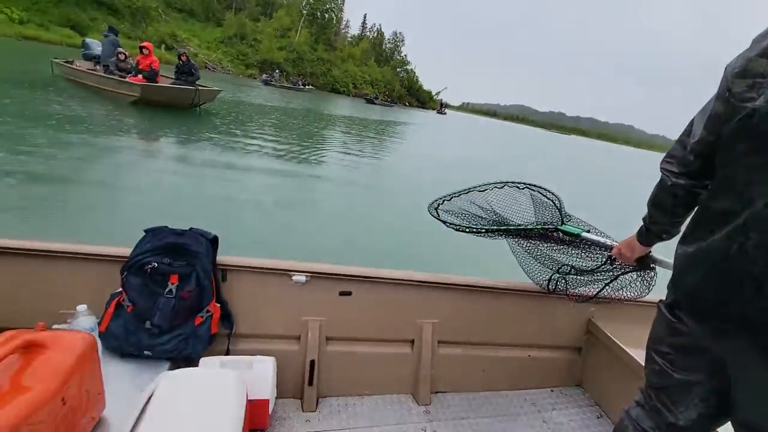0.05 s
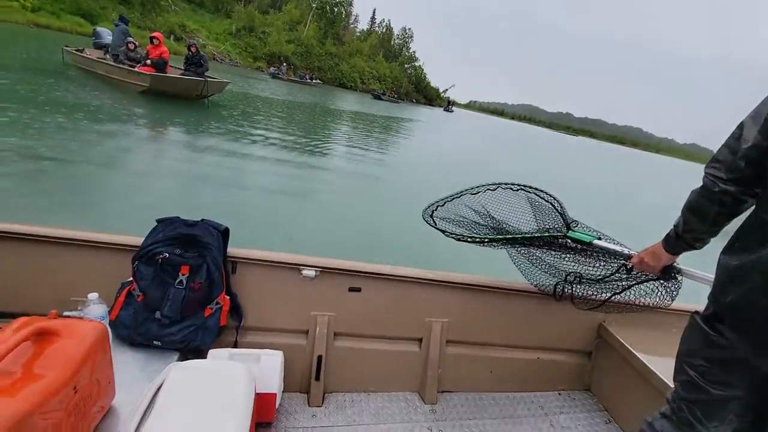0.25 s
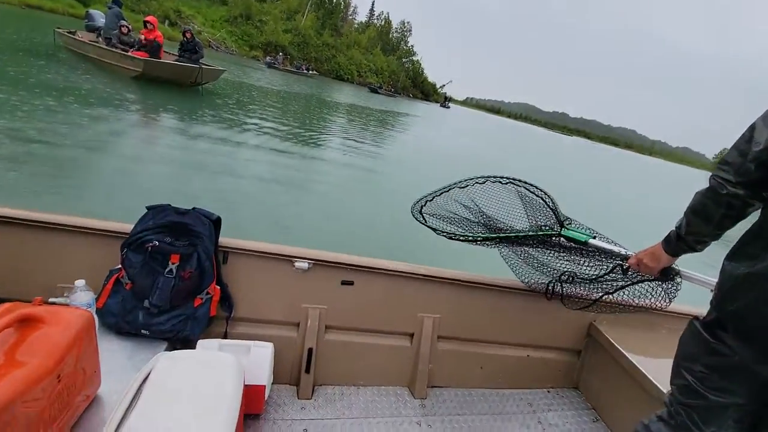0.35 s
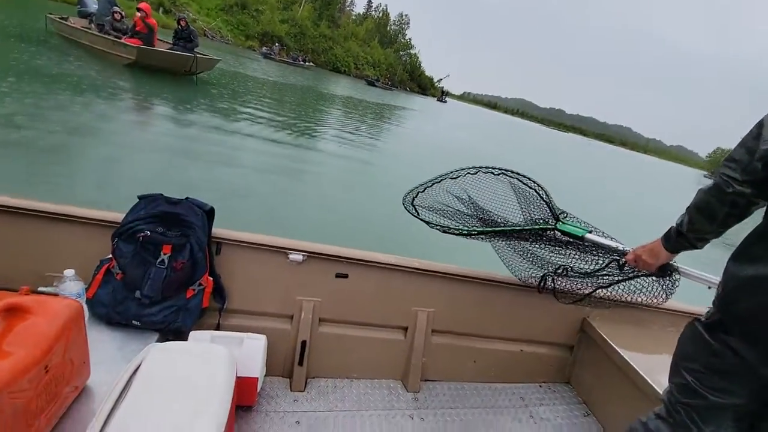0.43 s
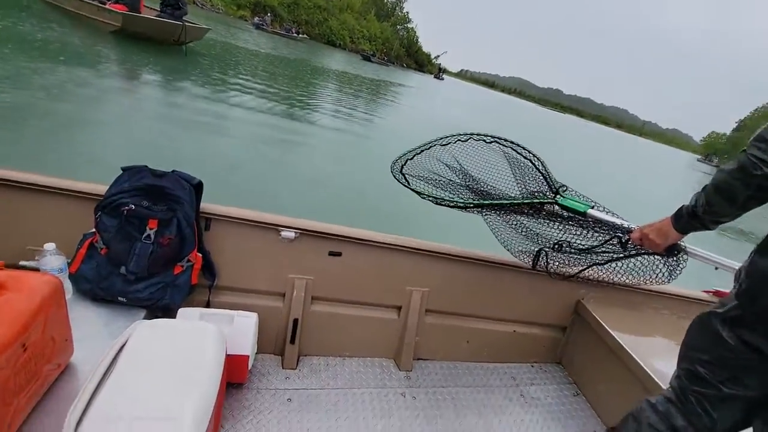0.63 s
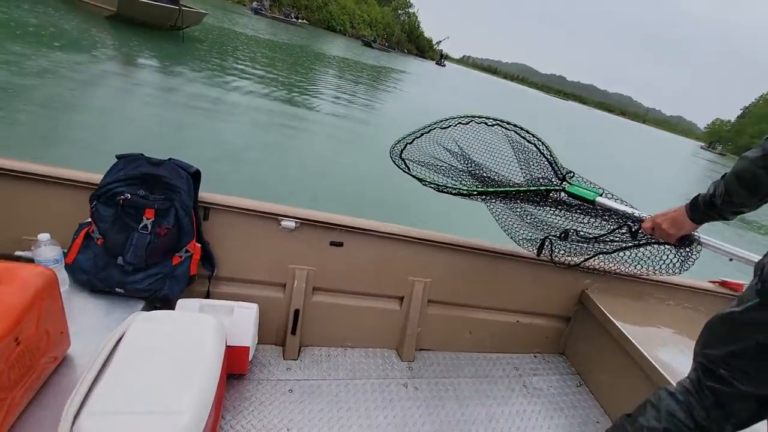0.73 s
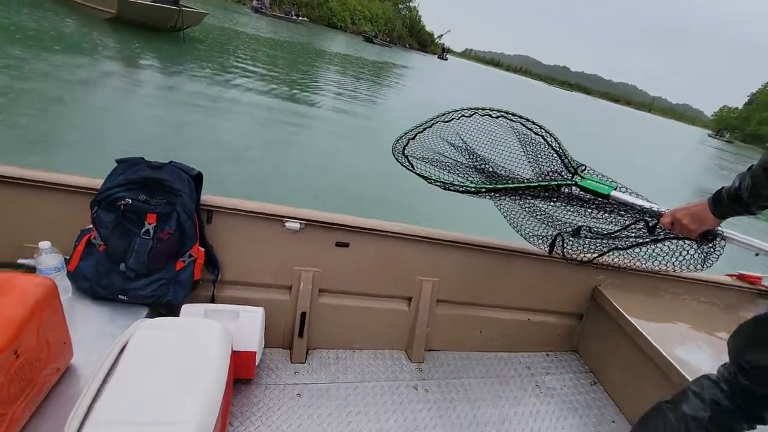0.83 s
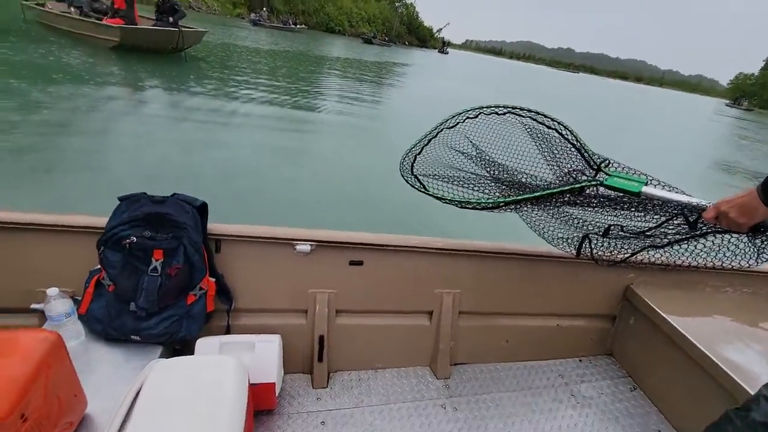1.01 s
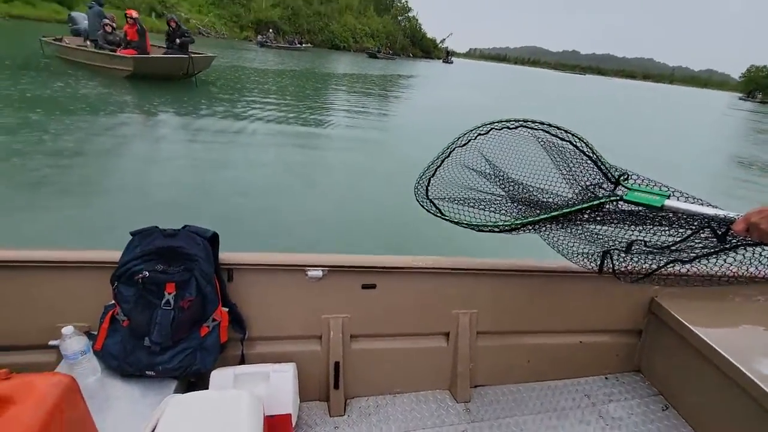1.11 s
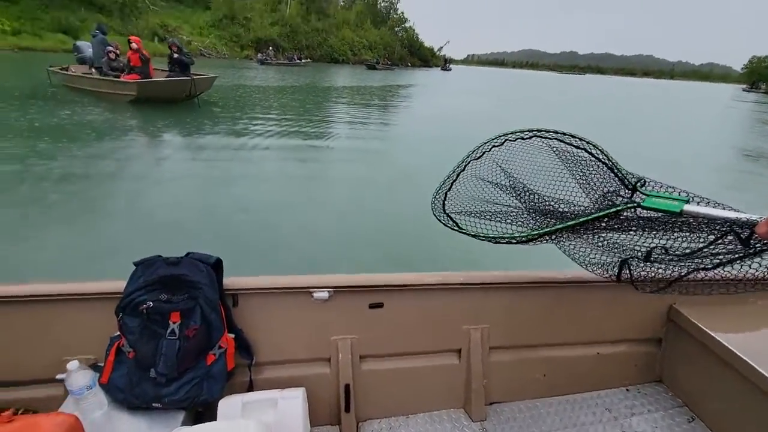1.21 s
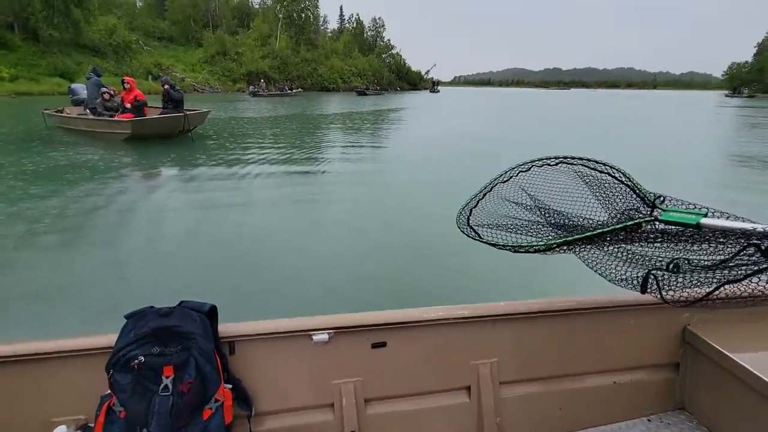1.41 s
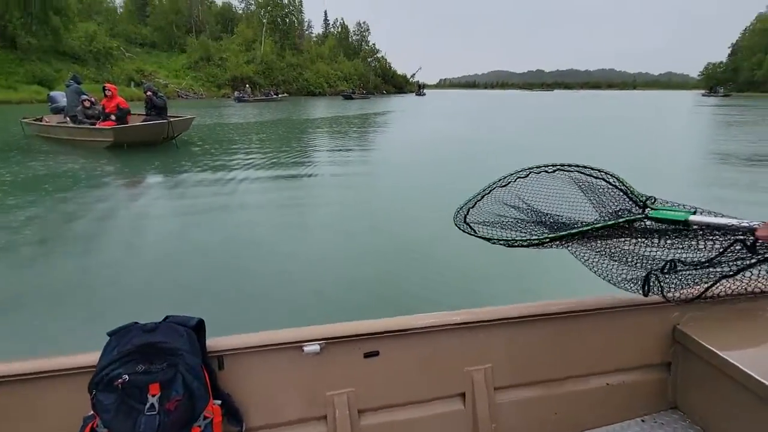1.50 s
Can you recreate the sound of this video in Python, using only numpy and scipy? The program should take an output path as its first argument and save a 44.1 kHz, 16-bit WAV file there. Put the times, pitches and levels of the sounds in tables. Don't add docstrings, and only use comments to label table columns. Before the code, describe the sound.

Close to a small stereo microphone, boots and gear thump a metal boat on a quiet river; a net handle rattles early, small ticks and wet cloth rustling follow, then one deep later thud.

```python
import sys
import numpy as np
from scipy import signal
from scipy.fft import rfft, irfft, next_fast_len
from scipy.io import wavfile
from scipy.ndimage import map_coordinates

SR = 44100
rng = np.random.default_rng(int(sys.argv[2]) if len(sys.argv) > 2 else 0)


def voltage_ratio(level):
    return 10 ** (np.asarray(level, float) / 20)


def pcm_store(signal):
    levels = np.round(np.clip(np.atleast_2d(signal), -1, 1) * 32767)
    wavfile.write(sys.argv[1], SR, levels.astype(np.int16).T)


N = 68355

SWAY_DB = 1.3
SCATTER_DB = 1.5


def unit(x):
    return x / np.sqrt(np.mean(x ** 2) + 1e-20)


def along(hz, f, v):
    return np.interp(np.log(hz + 1), np.log(np.asarray(f) + 1), v)


def curve_gain(f, curve):
    return voltage_ratio(along(f, *np.transpose(curve)))


def filtered(x, response):
    m = next_fast_len(len(x) + 8192)
    return irfft(rfft(x, m) * response(np.fft.rfftfreq(m, 1 / SR)), m)[:len(x)]


def wobble(rate, size=N):
    return map_coordinates(rng.standard_normal(20000), [np.arange(size) * rate / SR])


def add(out, s, x):
    part = out[max(round(s * SR), 0):][:len(x)]
    part += x[:len(part)]


def seconds(size):
    return np.arange(size) / SR


# t/s, f/Hz, level/dB, ringing length/s
PANEL_BOOMS = [(0.0, 106, -29.5, 0.013), (0.034, 94, -32.5, 0.058), (0.093, 109.8, -34.5, 0.071),
               (0.209, 84, -57, 0.062), (0.251, 83, -21.5, 0.015), (0.291, 88, -27, 0.073),
               (0.431, 78.4, -19.5, 0.059), (0.458, 80.7, -17.5, 0.032), (0.499, 92.1, -21.5, 0.096),
               (0.558, 63.5, -23.5, 0.1), (0.6, 76.6, -20, 0.014), (0.66, 83, -28.5, 0.028),
               (0.713, 63.3, -35, 0.049), (0.829, 69, -37.5, 0.0094), (0.894, 64, -29, 0.028),
               (0.94, 70, -25, 0.068), (1.039, 83, -34.5, 0.033), (1.077, 79, -41, 0.033),
               (1.132, 108.6, -17, 0.0087), (1.172, 76, -27, 0.012), (1.202, 65.9, -22, 0.061),
               (1.24, 60, -25.5, 0.077), (1.351, 63, -34, 0.014), (1.4, 70, -34, 0.042)]
BOOM_ATTACK_S, FREE_T60_S, DAMPED_T60_S = 0.003, 0.47, 0.05
BOOM_SAG = 0.022


def floor_panels():
    out, t = np.zeros(N), seconds(SR // 2)
    swell = 1 - np.exp(-t / BOOM_ATTACK_S)
    for s, hz, db, length in PANEL_BOOMS:
        phase = 2 * np.pi * hz * (t + BOOM_SAG * 0.016 * (1 - np.exp(-t / 0.0067)))
        fall_db = 60 * t / FREE_T60_S + 60 * np.maximum(t - length, 0) / DAMPED_T60_S
        level = db + 7.5 - fall_db + SWAY_DB * wobble(40, size=len(t))
        add(out, s, voltage_ratio(level) * swell * np.sin(phase))
    return out


# t/s, level/dB, favoured f/Hz, t60/s
HULL_BLOWS = [(0.0, -32.5, 180, 0.058), (.428, -17.5, 804, 0.046), (0.434, -30, 974, 0.12),
              (0.434, -30, 1250, 0.2), (.27, -44, 898, 0.13), (0.238, -20.5, 451.2, 0.057),
              (0.249, -14.5, 259, 0.032), (.268, -27.5, 514, 0.068), (0.274, -19, 340, 0.05),
              (.305, -38, 338, 0.041), (.31, -33.5, 204, 0.11), (.325, -45.5, 460.4, 0.11),
              (.35, -49.5, 367, .2), (.37, -29, 278, 0.05), (.428, -16, 381.5, 0.062),
              (.432, -15, 240.5, 0.054), (0.441, -4, 312.5, 0.054), (.44, -29.5, 546.7, 0.12),
              (.463, -11, 387.7, 0.075), (.468, -16, 225.6, 0.05), (.486, -18.5, 411.7, 0.062),
              (.49, -26.5, 324, 0.1), (.505, -16.5, 395.3, 0.05), (.52, -30, 296, .15),
              (0.539, -22.5, 224.4, 0.047), (0.579, -31, 281.8, 0.18), (.57, -29.5, 408, 0.15),
              (0.618, -36, 366, 0.11), (0.666, -32.5, 221.6, 0.1), (0.894, -33.5, 343, 0.11),
              (.9, -41, 519, 0.083), (.93, -40.5, 263.7, 0.34), (0.946, -27.5, 367, 0.052),
              (.95, -40, 499.4, 0.053), (0.983, -43.5, 451, 0.21), (1.03, -51, 449.3, 0.12),
              (1.131, -11, 156, 0.066), (1.131, -30, 284.3, 0.181), (1.131, -30.5, 440, 0.036),
              (1.145, -32.5, 571, 0.047), (1.165, -29.5, 408, 0.067), (1.172, -34.5, 686, 0.033),
              (1.176, -33, 210, 0.078), (1.198, -36, 279, 0.22), (1.215, -36.5, 422.5, 0.1),
              (1.268, -39.5, 393.3, 0.097), (1.33, -50.5, 420, 0.22), (1.432, -41, 288, 0.059),
              (1.44, -47.5, 407, 0.25)]
# f/Hz, level/dB
HULL_MODES = [(155, 0), (205, -2), (239, 0), (305, -1), (345, 0), (397, 1), (436, -1), (468, -3), (552, -6),
              (625, -9), (808, -9), (978, -11), (1100, -11), (1330, -13)]
SPREAD_DB_OCT, NEIGHBOURS_DB = 18, -5.5
RING_ATTACK_S, DETUNE = 0.0051, 0.008
FADE = 0.24


def hull():
    out, t = np.zeros(N), seconds(SR // 2)
    hz, level = np.transpose(HULL_MODES)[:, :, None]
    chance = rng.standard_normal((60, 2, len(HULL_MODES), 1))
    for (s, db, centre_hz, t60), (size, tune) in zip(HULL_BLOWS, chance):
        fall_db = 60 * t / t60 * (hz / 400) ** FADE
        off_db = SPREAD_DB_OCT * abs(np.log2(hz / centre_hz))
        gain = voltage_ratio(db + level + SCATTER_DB * size - off_db - fall_db)
        modes = (gain * np.sin(2 * np.pi * hz * (1 + DETUNE * tune) * t)).sum(0)
        favoured = voltage_ratio(db - 60 * t / t60) * np.sin(2 * np.pi * centre_hz * t)
        ring = voltage_ratio(NEIGHBOURS_DB) * modes + favoured
        add(out, s, ring * (1 - np.exp(-t / RING_ATTACK_S)))
    return out


# t/s, level/dB, contact length/s, t60/s, brightest f/Hz
CONTACTS = [(0.0, -47, 0.0045, 0.007, 900), (0.041, -61.5, 0.0076, 0.19, 6340),
            (0.2312, -36.5, 0.009, 0.085, 1920), (0.2365, -30, 0.012, 0.027, 2090),
            (0.239, -29.5, 0.0031, .02, 8600), (.255, -38.5, 0.0048, 0.12, 3880),
            (0.271, -49, 0.01, 0.064, 1500), (0.31, -45, 0.012, 0.056, 3730),
            (0.425, -33, 0.016, 0.04, 1100), (0.432, -34.5, 0.0021, 0.058, 2050),
            (.441, -32.5, 0.0021, 0.086, 2500), (0.453, -30, 0.0055, 0.05, 2040),
            (0.468, -43.5, 0.0072, 0.028, 2500), (1.13, -46.5, 0.019, 0.13, 660),
            (1.136, -41.5, 0.0031, 0.038, 4020), (1.146, -42, .003, .05, 3030),
            (1.154, -69, 0.0023, 0.042, 2500), (1.196, -46, 0.004, 0.018, 1400),
            (1.243, -38.5, 0.0034, 0.056, 4900), (1.257, -62.5, 0.054, 0.086, 12600),
            (1.364, -52, 0.0011, 0.026, 610), (1.399, -60.5, 0.0062, 0.02, 9600),
            (1.434, -60.5, 0.0015, 0.016, 600)]
# f/Hz, t60 factor
CONTACT_DECAY = [(700, 0.92), (3000, 1.06), (12000, 0.62)]
BELOW_DB_OCT, ABOVE_DB_OCT, DULL_HZ = 10, 5, 8000
GRIT_DB = 1.5
AFTER_DB, AFTER_T60_S = -19.5, 0.2


def clatter():
    out, n = np.zeros(N), SR // 3
    for s, db, hold, t60, top_hz in CONTACTS:
        def colour(f):
            below_db = BELOW_DB_OCT * np.minimum(np.log2(f / top_hz + 0.0036), 0)
            above_db = ABOVE_DB_OCT * np.maximum(np.log2(f / top_hz + 0.0037), 0)
            return voltage_ratio(below_db - above_db) / (1 + (f / DULL_HZ) ** 2)

        grit = rng.standard_normal(n) * voltage_ratio(GRIT_DB * wobble(330.0, size=n))
        raw = unit(filtered(grit, colour))
        hz, t, z = signal.stft(raw, SR, nperseg=128, noverlap=112)
        late = np.maximum(t - hold, 0) / along(hz, *np.transpose(CONTACT_DECAY))[:, None]
        decay = voltage_ratio(-60 * late / t60) + voltage_ratio(AFTER_DB - 60 * late / AFTER_T60_S)
        x = signal.istft(z * decay, SR, nperseg=128, noverlap=112)[1]
        add(out, s, voltage_ratio(db) * x[:n] * np.minimum(seconds(n) / 0.0012, 1))
    return out


# f/Hz, level/dB
PLATE_COLOUR = [(100, -30), (170, 0), (480, 0), (750, -8), (1500, -12), (4000, -22)]


def plating(x):
    fall = voltage_ratio(-60 * seconds(N) / 0.3)
    tail = filtered(rng.standard_normal(N), lambda f: curve_gain(f, PLATE_COLOUR)) * fall
    return x + voltage_ratio(-7) * signal.fftconvolve(x, tail / np.linalg.norm(tail))[:N]


# f/Hz, density level/dB
WATER_COLOUR = [(25, -20), (86, 8), (170, -4), (450, -10), (870, -32), (1620, -33.5), (6000, -42),
                (13000, -74)]


def river():
    water = unit(filtered(rng.standard_normal(N), lambda f: curve_gain(f, WATER_COLOUR)))
    return water * voltage_ratio(-42 + SWAY_DB * wobble(12.06))


# t/s, level/dB
CLOTH_RUB = [
    (0, -71.5),
    (0.201, -65.5),
    (0.401, -72),
    (.78, -65),
    (.81, -64),
    (.95, -57),
    (1.07, -58),
    (1.11, -60.5),
    (1.271, -64.5),
    (1.55, -65),
]
# f/Hz, density level/dB
CLOTH_COLOUR = [(900, -2.5), (1500, -8), (3000, -4.5), (5500, -11.5), (11000, -19.5), (16000, -16)]
# f/Hz, level/dB
WEAVE_PEAKS = [(3900, 1), (7500, 7.5), (9000, 4.5), (12000, 7)]


def bumps(f, peaks, q):
    return sum(db / (1 + (2 * q * (f / hz - 1)) ** 2) for hz, db in peaks)


def rain_cloth():
    s, db = np.transpose(CLOTH_RUB)
    rub = rng.standard_normal(N) * voltage_ratio(1.6 * wobble(190))
    rub = unit(filtered(rub, lambda f: curve_gain(f, CLOTH_COLOUR) * voltage_ratio(bumps(f, WEAVE_PEAKS, 5.5))))
    return rub * voltage_ratio(np.interp(seconds(N), s, db) + SWAY_DB * wobble(45.0))


# f/Hz, level/dB, t60/s
HANDLE_MODES = [(1115, -1, 0.06), (1360, -5, 0.072), (1897, -11, 0.068), (2381, -3, 0.054),
                (2650, -16, 0.079), (3480, 0, 0.13), (3735, 4.5, 0.044), (4167, -3, .08), (5168, -6, .08),
                (5654, -7, .07), (6530, 0.5, .06), (7760, -4, 0.049)]
# t/s, level/dB
HANDLE_KNOCKS = [
    (.2325, -45),
    (.237, -32),
    (.242, -33),
    (.249, -40),
    (.312, -52),
    (.43, -43),
    (.441, -43),
]
# f/Hz, level/dB, t60/s
BUCKLE_MODES = [(1250, -12, .08), (2676, -1, .045), (3090, 0, .05), (3601, -5, .05), (4005, -7, .06),
                (4210, -5, .08), (4748, -9, .05), (5329, -5, .06), (6465, -4, .035)]
# t/s, level/dB
BUCKLE_KNOCKS = [
    (1.137, -55),
    (1.244, -44),
    (1.247, -45),
]
CHATTER_DB = 4


def fittings():
    out, t = np.zeros(N), seconds(SR // 5)
    for modes, hits in ((HANDLE_MODES, HANDLE_KNOCKS), (BUCKLE_MODES, BUCKLE_KNOCKS)):
        hz, level, t60 = np.transpose(modes)[:, :, None]
        chance = rng.standard_normal((12, 2, len(modes), 1))
        for (s, db), (size, turn) in zip(hits, chance):
            gain = voltage_ratio(db + level + SCATTER_DB * size - 60 * t / t60)
            ring = gain * np.sin(2 * np.pi * hz * t + 2 * turn)
            add(out, s, ring.sum(0) * np.minimum(t / 0.0011, 1))
    return out * voltage_ratio(CHATTER_DB * wobble(450))


# t/s, f/Hz, level/dB
SQUEAK_GLIDE = [
    (0.583, 2780, -67.5),
    (0.596, 2764, -53),
    (0.623, 2717, -54),
    (.645, 2584, -56),
    (0.653, 2680, -58),
]
# multiple of the pitch, level/dB
SQUEAK_PARTIALS = [(.34, -6), (.9, -5), (1.0, -1), (1.3, -12)]


def sole():
    s, hz, db = np.transpose(SQUEAK_GLIDE)
    t = seconds(N)
    turns = np.cumsum(np.interp(t, s, hz) * (1 + 0.004 * wobble(150))) / SR
    tone = np.zeros(N)
    for multiple, level in SQUEAK_PARTIALS:
        tone += voltage_ratio(level - 3 + 6 * wobble(150)) * np.cos(2 * np.pi * multiple * turns)
    return tone * voltage_ratio(np.interp(t, s, db, -120, -120))


# t/s, level/dB, f/Hz, t60/s
SMALL_TICKS = [
    (.641, -53, 1068, 0.089),
    (.676, -62.5, 7180, 0.073),
    (.707, -62, 7130, 0.041),
    (.894, -59, 3790, 0.12),
    (0.946, -55, 3960, .05),
    (0.999, -53.5, 2696, 0.051),
    (1.056, -60, 3760, 0.099),
    (1.059, -65.5, 7950, 0.21),
    (1.155, -46.5, 2120, 0.037),
]
TICK_Q, TICK_SKIRT, PUFF = 5, 0.4, 1.1


def ticks():
    out, t = np.zeros(N), seconds(SR // 8)
    for s, db, hz, t60 in SMALL_TICKS:
        puff = filtered(rng.standard_normal(len(t)),
                        lambda f: 1 / (TICK_SKIRT + (TICK_Q * np.log2(f / hz + 1e-3)) ** 2))
        body = PUFF * unit(puff) + np.sin(2 * np.pi * hz * t)
        add(out, s, voltage_ratio(db + 0.5 - 60 * t / t60) * body * np.minimum(t / 0.00051, 1))
    return out


# f/Hz, level/dB, phase/rad
PORT_DIFFERENCE = [(60, 1.8, -.15), (215, 5.5, -.2), (300, 14, -.9), (390, 8, -2.2), (560, .6, -2.6),
                   (1000, -11, -3.1), (1300, -12.5, -4.4), (3900, -17, -4.8), (13000, -32, -4.8)]
# f/Hz, level/dB
STRAY_COLOUR = [(60, -21), (300, -17.5), (900, 0), (2000, -18), (12000, -31.5)]


def two_ports(near):
    scatter = rng.standard_normal(400).cumsum()

    def scattered(f):
        return curve_gain(f, STRAY_COLOUR) * np.exp(1j * np.interp(f / 60, np.arange(400), scatter))

    stray = filtered(near, scattered) * wobble(25)
    hz, db, turn = np.transpose(PORT_DIFFERENCE)
    left = filtered(near, lambda f: 2 / (1 + voltage_ratio(along(f, hz, db)) * np.exp(1j * along(f, hz, turn))))
    return np.array([left + stray, 2 * near - left - stray])


def scene():
    near = floor_panels() + plating(hull() + clatter())
    near = near + fittings() + ticks() + sole()
    near = near + river() + rain_cloth()
    near = filtered(near, lambda f: (1j * f / (30 + 1j * f)) ** 2)
    return two_ports(near)


def band_limit(x):
    return signal.sosfilt(signal.butter(12, 16320, fs=SR, output="sos"), x)


def record(dry):
    rounded = [x / (1 + abs(x / 1.25) ** 3) ** (1 / 3) for x in dry]
    mix = np.array([filtered(x, lambda f: f < 15900) for x in rounded])
    return band_limit(mix)


dry = scene()
out = record(dry)
pcm_store(out)
```